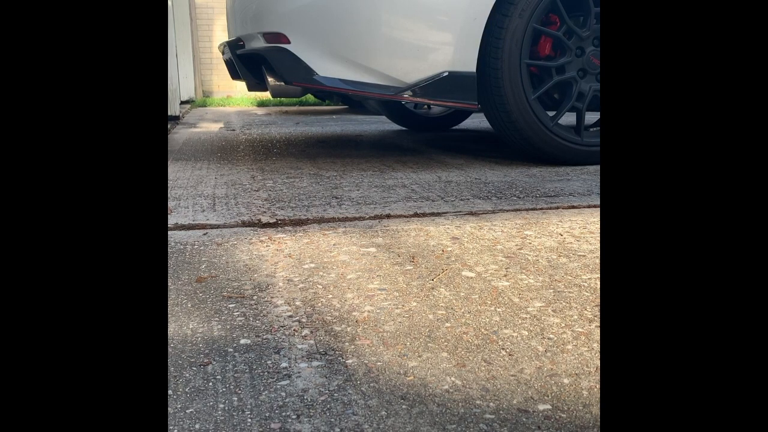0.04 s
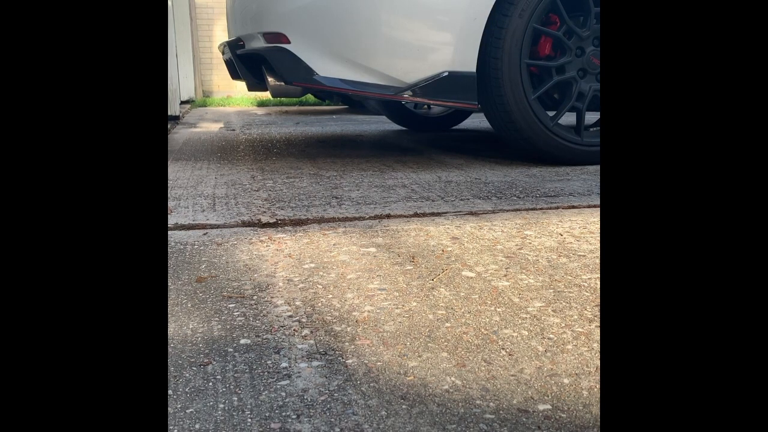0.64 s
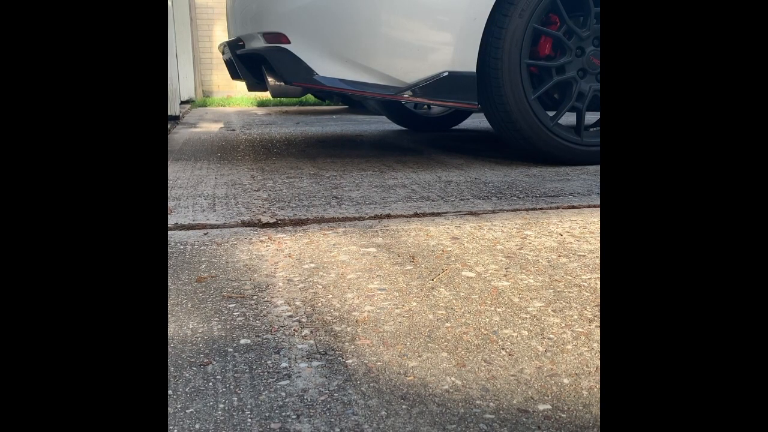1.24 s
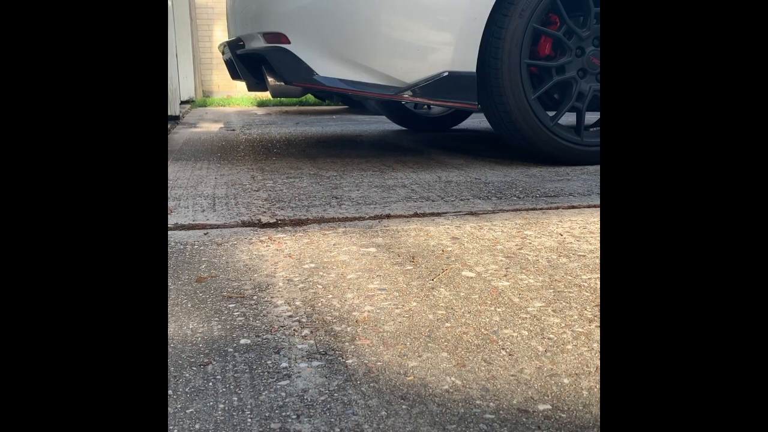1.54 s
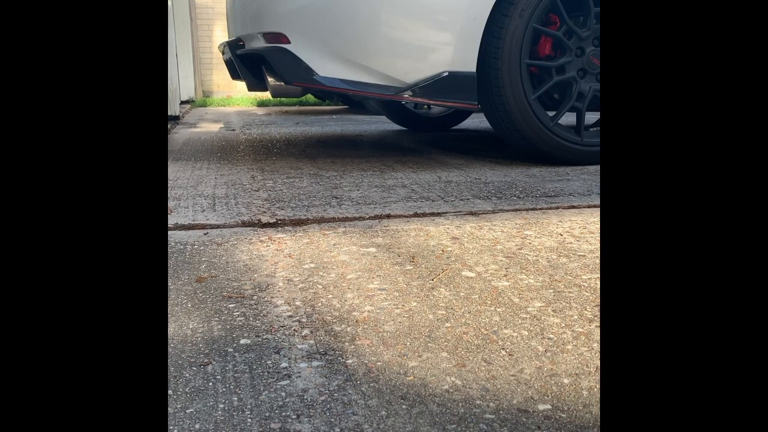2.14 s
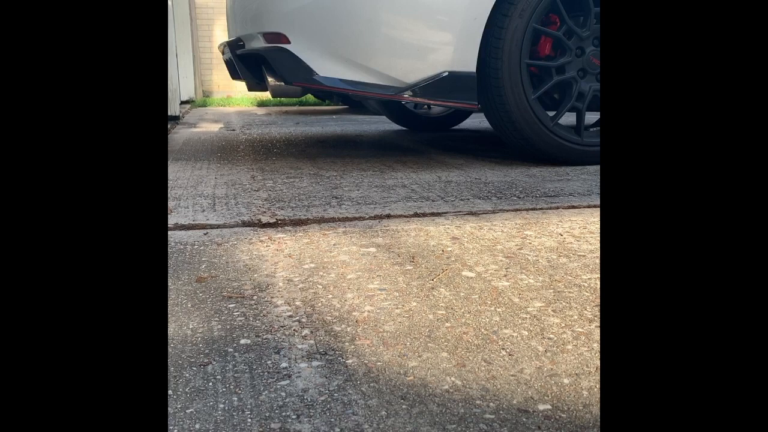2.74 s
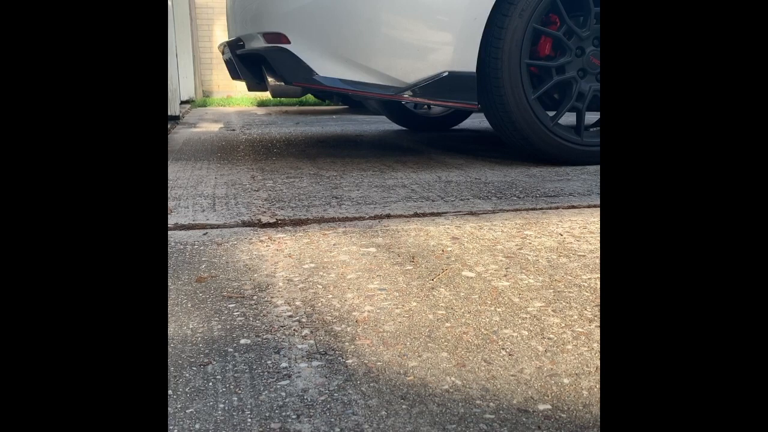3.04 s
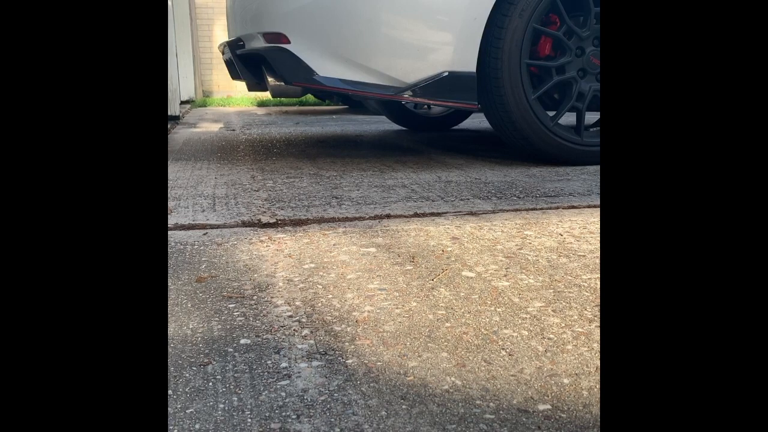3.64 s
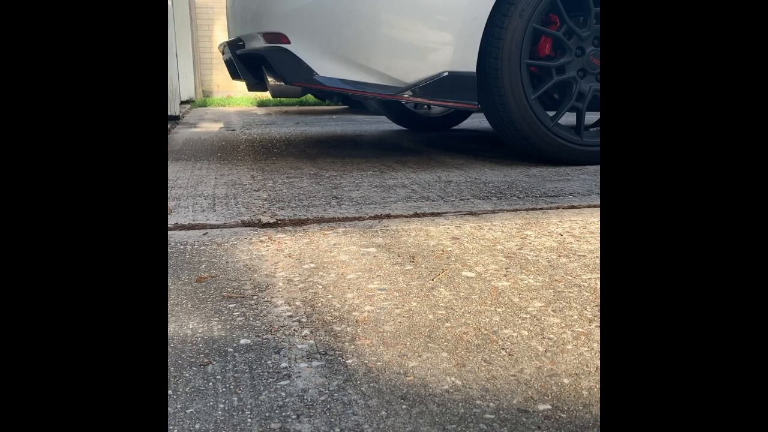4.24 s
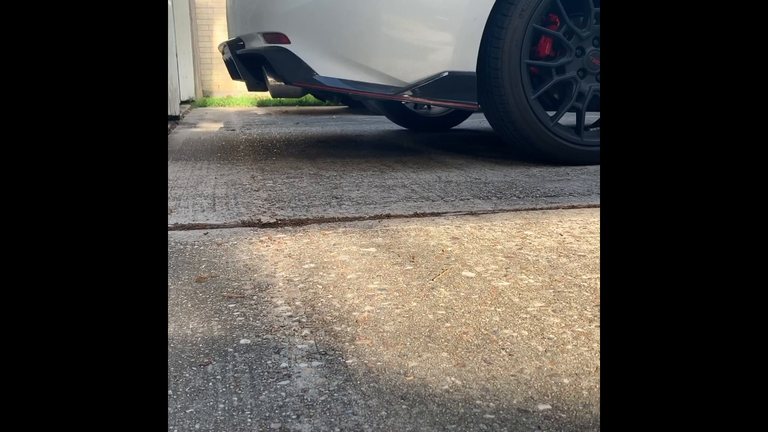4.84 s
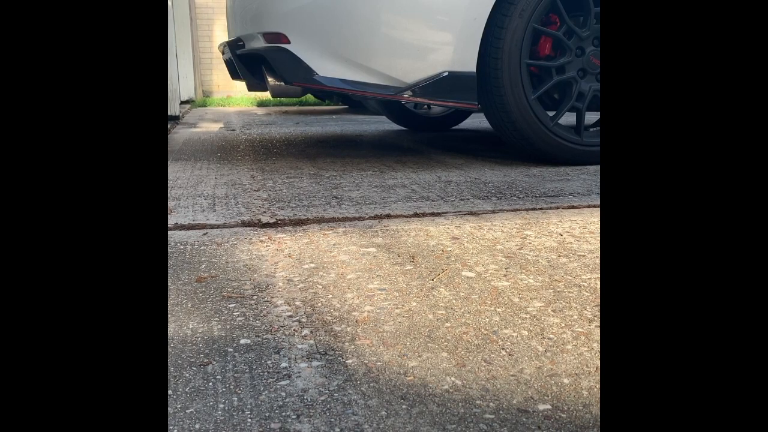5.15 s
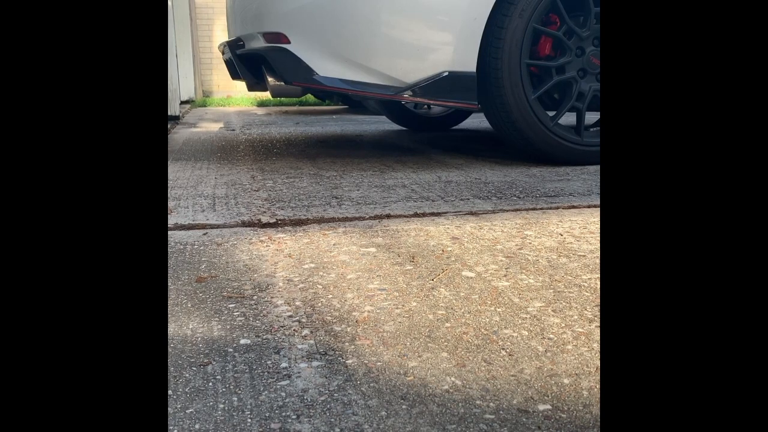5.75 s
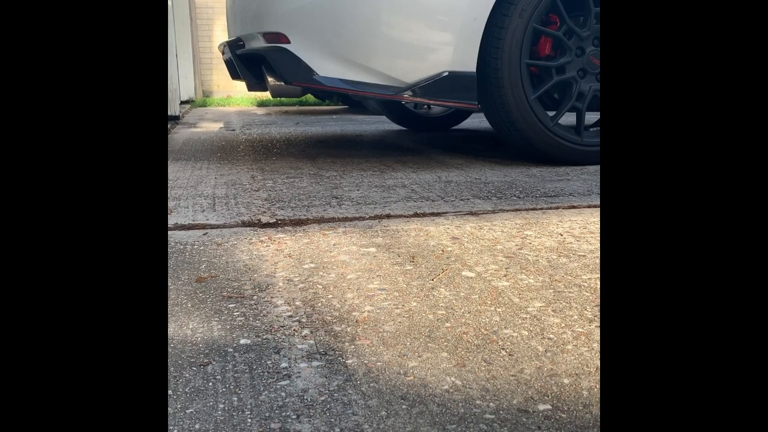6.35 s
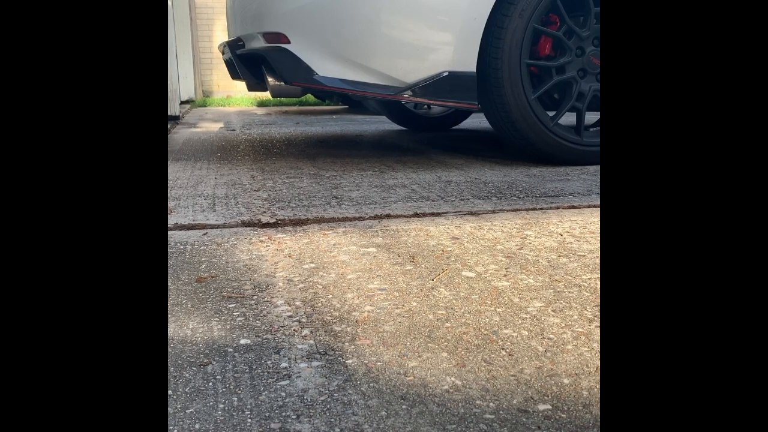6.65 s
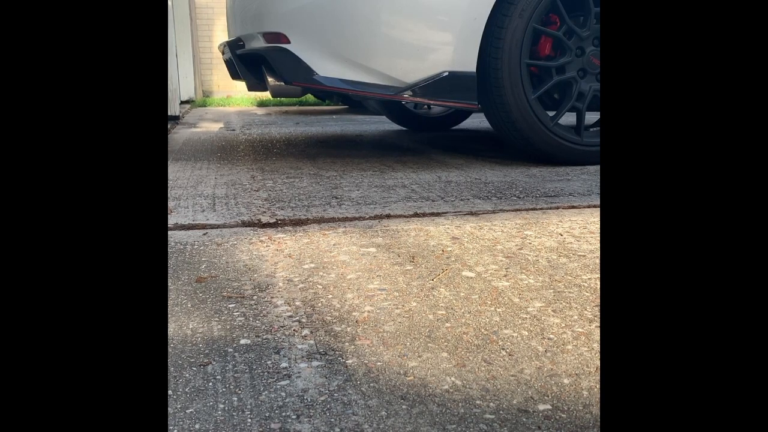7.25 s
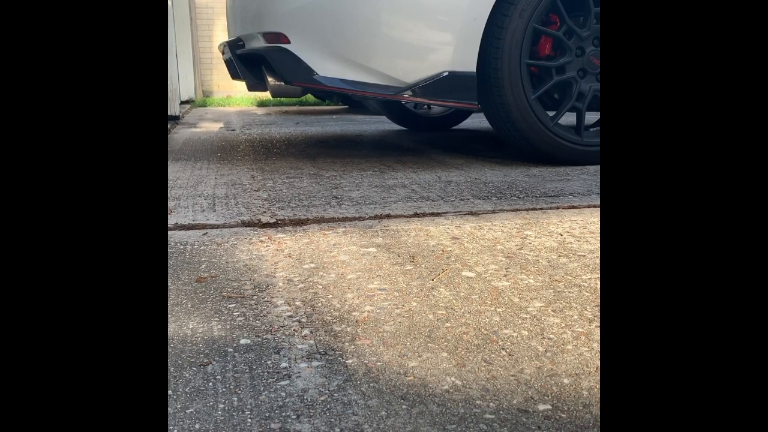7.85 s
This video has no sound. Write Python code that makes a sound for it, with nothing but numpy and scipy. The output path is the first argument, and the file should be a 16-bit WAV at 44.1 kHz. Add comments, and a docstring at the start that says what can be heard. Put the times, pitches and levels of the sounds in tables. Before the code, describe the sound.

Low, steady car engine idle broken by one quick rev that burbles and pops as it drops, while distant birds chirp faintly.

```python
"""A six-cylinder car idles, heard beside its tailpipes. One throttle blip: the intake barks,
the revs fall with a burble and a few soft pops, sag, and recover.
Firing pulses ring silencer, pipe and tips; turbulent gas rasps; fuel pops in the pipe.
Valve gear and belts rustle under the body. Birds call far off; wall and ground echo."""
import sys
import numpy as np
from scipy import signal
from scipy.fft import rfft, irfft, next_fast_len
from scipy.io import wavfile
from scipy.ndimage import uniform_filter1d, minimum_filter1d, map_coordinates

SR = 44100
rng = np.random.default_rng(int(sys.argv[2]) if len(sys.argv) > 2 else 0)


def persist_wave(psi):
    """Save psi, clipped to +-1, as 16-bit WAV."""
    counts = np.round(np.clip(psi, -1, 1) * 32767).astype(np.int16)
    wavfile.write(sys.argv[1], SR, np.atleast_2d(counts).T)


N = 352800
TIME_S = np.arange(N) / SR

# Crank speed. Each row: time in seconds, firing rate in Hz.
FIRING_RATE = [(0, 44.2), (.3, 50.18), (.55, 52.12), (1.4, 50.63), (2.74, 51.05), (2.8, 54), (2.866, 61.7),
               (2.938, 80.5), (2.99, 93.2), (3.045, 110.2), (3.07, 116), (3.12, 122.2), (3.2, 124.4),
               (3.38, 120.3), (3.52, 114.3), (4.1, 80.8), (4.28, 66.5), (4.45, 55.95), (4.7, 43.8),
               (5.22, 44.7), (5.7, 51.32), (6.1, 52.92), (6.9, 52.74), (7.5, 54.08), (7.8, 54.05), (8, 45)]
# Engine load. Each row: time in seconds, throttle 0-1, tip level in dB.
LOAD = [(0, 0.25, -22.5), (.15, 0.46, -24.5), (.55, 0.13, -21), (1.4, 0.09, -24.5), (2.74, 0.05, -24.5),
        (2.85, 0.63, -20), (3.03, 0.99, -14), (3.22, 0.87, -15), (3.4, 0, -23.5), (3.95, 0.06, -23.5),
        (4.3, 0.06, -28.5), (4.8, 0.09, -27.5), (5.3, 0.46, -24), (5.85, 0.21, -21.5), (7.78, 0.16, -22.5),
        (7.81, 0.08, -30), (8, 0.08, -43)]
# Cylinders in firing order. Each row: strength in dB, lag in firings; scaled per exhaust path.
CYLINDER_OFFSETS = [(3.6, 0.011), (0.9, -0.01), (2.8, -0.002), (3.84, 0.012), (4, -0.0094), (1.6, -0.002)]
# Late burning in the pipe. Each row: start and length in seconds, boom, drone and tip lifts in dB.
BURBLE_RUNS = [(3.467, 0.098, 0, 6.5, 7), (3.663, 0.062, -1, 8.5, 8.5), (3.773, 0.023, -10, 8, 5.5),
               (4.074, 0.043, 3, 9.5, 10), (4.142, 0.056, 1, 3.5, -0.5), (4.346, 0.09, -0.5, 9.5, 6)]
# Injectors shut while coasting. Each row: start and end in seconds, boom and drone changes in dB.
INJECTOR_CUTS = [(3.746, 4.134, -6, -6), (4.237, 4.34, -4, 0), (7.901, 7.949, -11.5, -5.5)]
# Fuel popping in the pipe. Each row: time in seconds, relative level in dB, snap level in dB.
FUEL_POPS = [(3.008, -3.5, -11), (3.021, -14, -14), (3.065, -22, -25), (3.465, -11.5, -37.5),
             (3.478, -13.5, -21), (3.508, -13.5, -32), (3.549, -10, -29), (3.674, -16, -29.5),
             (3.684, -10, -25.5), (3.708, -17, -31), (3.787, -25.5, -34), (4.073, -32, -41),
             (4.104, -15, -36), (4.125, -23.5, -42), (4.195, -27, -24), (4.357, -11, -17),
             (4.427, -19.5, -39)]
# Third-harmonic hums and tip howls. Each row: start and end in seconds, level in dB.
HUM_SPANS = [(3.683, 3.735, -31), (3.763, 3.808, -23), (4.169, 4.217, -13.5)]
HOWL_SPANS = [(.03, .26, -32), (5.2, 5.5, -38)]
# Belt chirps. Each row: peak time in seconds, level in dB.
BELT_CHIRPS = [(.32, -47.5), (.43, -44), (.55, -49.5), (.9, -46.5), (1.38, -51), (2.08, -49.5),
               (2.891, -37.5), (3.003, -28.5), (3.99, -45), (4.19, -50), (4.98, -54), (5.24, -52.5),
               (5.37, -45.5), (5.515, -46), (5.63, -43), (5.979, -43.5), (6.2, -44.5), (6.55, -44.5),
               (7.0, -45.5), (7.12, -46.5), (7.43, -48), (7.669, -47.5)]
# Bird notes. Each row: start and length in seconds, start and end pitch in Hz,
# relative level in dB, trill depth in Hz.
BIRD_NOTES = [(0.828, .035, 2990, 2750, -38, 20), (0.872, .07, 2570, 2400, -40, 170),
              (0.946, 0.064, 2760, 2570, -38, 20), (1.394, 0.055, 3140, 2710, -34.5, 20),
              (1.435, 0.069, 2410, 2420, -37.5, 120), (1.509, 0.06, 2740, 2545, -35, 20),
              (2.019, 0.078, 3140, 2900, -36.5, 240), (2.112, 0.033, 2650, 2400, -37.5, 110),
              (2.477, 0.096, 2800, 2640, -38, 40), (2.528, .015, 2470, 2250, -37, 130),
              (2.573, .08, 2406, 2303, -33.5, 16), (5.102, .04, 1060, 987, -31, 45),
              (6.565, .035, 2900, 2740, -41, 130), (6.588, 0.055, 2600, 2430, -43.5, 170),
              (6.656, .06, 2660, 2600, -36.5, 50), (7.12, 0.027, 3037, 2770, -30.5, 20),
              (7.15, 0.045, 2520, 2430, -37, 150), (7.223, .065, 2660, 2520, -37, 20),
              (7.767, 0.083, 3140, 2950, -34.5, 270)]

# Exhaust responses. Each row: frequency in Hz, gain in dB.
SILENCER_RESPONSE = [(12, -53.5), (25, -35), (42, 3), (55, 17), (78, 2), (100, -31.5), (135, -51),
                     (300, -69.5), (1500, -160)]
LONG_PIPE_RESPONSE = [(60, -43.5), (118, -15), (140, -31.5), (165, -1), (190, -4), (215, 3.5), (250, 0.5),
                      (290, -22), (380, -54), (800, -120)]
TIP_RESPONSE = [(150, -62.5), (235, -14), (280, -2), (306, 10), (345, 9), (378, -4), (405, -11), (432, -9),
                (470, -22), (505, -7), (580, -11), (620, -18), (655, -10.5), (730, -34.5), (815, -25),
                (950, -42), (2500, -70.5), (8000, -120)]
RASP_RESPONSE = [(100, -36), (200, 13), (260, 11.5), (350, 13), (460, -24.5), (510, 13), (570, 10.5),
                 (660, 5.5), (730, -20.5), (840, -2.5), (980, -13.5), (1200, -26), (2500, -37.5),
                 (6000, -29.5), (12000, -100)]
GROWL_RESPONSE = [(120, -34.5), (165, -11), (200, 3.5), (232, -5), (255, 2)]
POP_RESPONSE = [(100, -38.5), (210, 7), (350, 11), (450, -4), (540, 3), (660, 4.5), (740, -4.5), (840, 0),
                (980, -18), (1250, -13), (1700, -45), (3000, -36), (10000, -100)]
SNAP_RESPONSE = [(400, -35.5), (850, 11), (1020, -7), (1230, -3), (1650, 1), (2200, -20), (6000, -18.5),
                 (12000, -47)]
# Engine bay noise spectra. Each row: frequency in Hz, gain in dB.
RUSTLE_SPECTRUM = [(410, 7.5), (700, -9.5), (754, -5.5), (838, -4), (910, -9.5), (1010, -11), (1380, -12),
                   (1660, -10), (1810, -14), (2040, -14.5), (2270, -16), (3640, -26.5), (4200, -34),
                   (5460, -51.5), (9240, -120)]
HISS_SPECTRUM = [(2500, -2), (3200, 0), (3800, -5.5), (4400, 0.5), (5000, 2.5), (5600, -3), (7400, 0.5),
                 (9400, -1.5), (9700, 2), (9950, 3), (11000, -14), (13000, -3), (14200, -6.5), (15200, -20)]
SWISH_SPECTRUM = [(600, -36), (1100, -16.5), (1450, -3.5), (1650, -9.5), (1950, -1.5), (2300, -13.5),
                  (4000, -31.5), (8000, -80.5)]
CHIRP_SPECTRUM = [(900, -32), (1480, -12), (1650, 4), (1830, -12.5), (2000, -6.5), (2200, -21), (5000, -53)]
# Faint, steady, narrow tones in the background noise. Each row: centre in Hz, width in Hz, gain in dB.
NARROW_TONES = [(1140, 24, 7.5), (1644, 14, -3.5), (1966, 11, 6), (2366, 26, 1), (2570, 39, -6),
                (2893, 20, -0.5), (4800, 76, -15.5), (8750, 46, -16)]
# Echo decay. Each row: frequency in Hz, T60 in seconds.
YARD_T60 = [(100, 0.06), (600, 0.38), (3000, 0.16), (10000, 0.21)]
# Noise width. Each row: frequency in Hz, side minus mid in dB.
STEREO_WIDTH = [(60, -29.5), (110, -18), (200, -10), (380, -10), (700, -2.5), (1290, 1.5), (2380, 0.5),
                (4400, 9.5), (8120, -7), (15000, 0.5)]
# Balance before the bass is centred. Each row: frequency in Hz, left minus right in dB.
STEREO_TILT = [(200, -1.5), (380, 0.5), (700, 3.5), (1300, -0.5), (2400, 0), (4400, -2.5), (8000, 0.5)]

IDLE_HZ, TIP_LEAD_FIRINGS = 51, 0.4015
SCATTER_DB, SAG_DB_PER_HZ, COAST_DB_PER_HZ_PER_S = .52, .012, .029
BOOM_DB, BOOM_THROTTLE_DB, BOOM_DB_PER_S = -16, 3.5, 0.1845
DRONE_DB, DRONE_THROTTLE_DB = -25.5, 14.5
BURBLE_ATTACK_S, BURBLE_RELEASE_S, CUT_RAMP_S = 0.0028, 0.029, 0.014
RASP_DB, RASP_PER_SCATTER, RASP_GULP_DB, RASP_THROTTLE_DB = -14, 3.3, 4, 3.5
GROWL_DB, HOWL_HZ, HOWL_HALF_WIDTH_HZ = -6.5, 578, 26
GULP_LAG_S, GULP_EXPONENT = 0.011, 0.74
BAY_DB, BAY_DB_PER_OCTAVE, BAY_GULP_DB, BAY_DB_PER_S = -47.5, 3, 14, 0.32
HISS_DB, HISS_DB_PER_OCTAVE, HISS_GULP_DB, HISS_DB_PER_S = -51.5, 5, 3, 0.13
BELT_DB, BELT_RUB_FIRINGS, CHIRP_RAMP_S = -54, 4.4, 0.032
SPIT_S, SPIT_DB, RUMBLE_DB = 4.5, -53, -43
PIPE_LAG_S, HISS_LAG_S, HISS_DIFFUSE_DB = 0.00024, .00021, 3.5


def exhaust(phase):
    """Firing pulses ring the silencer (boom), the long pipe (drone) and the tips."""
    boom_db, drone_db, tip_db = exhaust_levels()
    pulses = firings(phase, bank_db=-10, bank_lag=0.026, imbalance=0.7, jitter=0.02)
    boom = unit(ring(pulses, SILENCER_RESPONSE))
    pulses = firings(phase, bank_db=2.5, bank_lag=0.015, imbalance=0.74)
    drone = chamber(pulses, LONG_PIPE_RESPONSE, delay_s=0.0075)
    pulses = firings(phase + TIP_LEAD_FIRINGS, bank_db=-7.5, bank_lag=0.049, imbalance=1.03)
    tips = chamber(pulses, TIP_RESPONSE, delay_s=.012)
    return amp(boom_db) * boom + amp(drone_db) * drone + amp(tip_db) * tips + gas_rasp(phase, tip_db)


def firings(phase, bank_db, bank_lag, imbalance, jitter=.012):
    """One pulse per firing. Banks alternate; throttle shrinks the far bank's offset (dB, firings)."""
    k = np.arange(int(phase[-1]) + 1)
    due = np.searchsorted(phase, k)
    far_bank = k % 2 * (1 - throttle()[due])
    scatter = scatter_db()[due]
    random_db, random_lag = rng.standard_normal((len(k), 2)).T * [scatter, scatter ** 2]
    own_db, own_lag = imbalance * np.array(CYLINDER_OFFSETS)[k % len(CYLINDER_OFFSETS)].T
    fired = np.searchsorted(phase, k + far_bank * bank_lag + own_lag + jitter * random_lag)
    return np.bincount(np.clip(fired, 0, N - 1), amp(far_bank * bank_db + own_db + random_db), N)


def chamber(pulses, response, delay_s):
    """A winding chamber rings and holds higher tones back; delay_s applies at 300 Hz."""
    dispersed = filtered(pulses, lambda hz: np.exp(-1j * np.pi * delay_s * hz ** 2 / 300))
    return steady(ring(dispersed, response))


def exhaust_levels():
    """Boom, drone and tip dB follow the load. Burbles lift them; fuel cuts drop boom and drone."""
    lift_db = sum(np.outer(lifts, swell(start, start + length, BURBLE_ATTACK_S, BURBLE_RELEASE_S))
                  for start, length, *lifts in BURBLE_RUNS)
    boom_cut_db, drone_cut_db = sum(np.outer(cuts, swell(start, end, CUT_RAMP_S, CUT_RAMP_S))
                                    for start, end, *cuts in INJECTOR_CUTS)
    boom_db = BOOM_DB + BOOM_THROTTLE_DB * throttle() + BOOM_DB_PER_S * TIME_S + boom_cut_db
    drone_db = DRONE_DB + DRONE_THROTTLE_DB * throttle() + drone_cut_db
    return lift_db + [boom_db, drone_db, curves(LOAD)[1]]


def crank():
    """Firing rate in Hz, smoothed by the flywheel, and its slope in Hz/s."""
    rate_hz = uniform_filter1d(curves(FIRING_RATE)[0], size=2200)
    return rate_hz, np.gradient(rate_hz) * SR


def throttle():
    """Throttle opening, 0-1."""
    return np.clip(curves(LOAD)[0], 0, 1)


def scatter_db():
    """Scatter of firing strength: burning turns ragged when the engine sags or coasts."""
    rate_hz, slope = crank()
    sag_hz, fall_hz_per_s = np.maximum([IDLE_HZ - rate_hz, -slope * (1 - throttle())], 0)
    return SCATTER_DB + SAG_DB_PER_HZ * sag_hz + COAST_DB_PER_HZ_PER_S * fall_hz_per_s


def gulp():
    """Air intake, 0-1: lags the power that spins the crank up."""
    rate_hz, slope = crank()
    power = np.maximum(uniform_filter1d(rate_hz * slope, size=2600), 0)
    return np.interp(TIME_S - GULP_LAG_S, TIME_S, power / power.max())


def gas_rasp(phase, tip_db, decay_s=0.14):
    """Each firing drives a puff of turbulent gas against the tips."""
    pulses = firings(phase, bank_db=-10, bank_lag=0.028, imbalance=4.7)
    puffs = signal.lfilter([1], [1, -np.exp(-1 / (decay_s * SR))], pulses)
    rasp = steady(ring(puffs * rng.standard_normal(N), RASP_RESPONSE))
    lift_db = RASP_PER_SCATTER * scatter_db() + RASP_GULP_DB * gulp() + RASP_THROTTLE_DB * throttle()
    return amp(tip_db + RASP_DB + lift_db) * rasp


def growl(phase):
    """Firing harmonics ring the pipe: the second as the revs climb, the third after some burbles."""
    second = amp(GROWL_DB + along(GROWL_RESPONSE, 2 * crank()[0])) * np.sqrt(gulp())
    third = sum(amp(db) * swell(start, end, 0.023, 0.066) for start, end, db in HUM_SPANS)
    return second * np.sin(2 * np.pi * 2 * phase) + third * np.sin(2 * np.pi * 3 * phase)


def pops(puff_rise_s=0.0013, puff_t60_s=0.11, snap_t60_s=0.071):
    """Fuel pops: a pressure push and a rough puff ring the pipe, with a snap at its mouth."""
    t = np.arange(SR // 8) / SR
    attack = 1 - np.exp(-t / puff_rise_s)
    pushes, puffs, snaps = np.zeros((3, N))
    for start_s, db, snap_db in FUEL_POPS:
        puff, snap = rng.standard_normal((2, len(t)))
        add(pushes, start_s, amp([db + 26.5]))
        add(puffs, start_s, amp(db + 6 - 60 * t / puff_t60_s) * attack * puff)
        add(snaps, start_s, amp(snap_db - 60 * t / snap_t60_s) * snap)
    return ring(pushes + puffs, POP_RESPONSE) + ring(snaps, SNAP_RESPONSE)


def howl():
    """A narrow tip resonance sings as the engine pulls up from a sag."""
    noise = rng.standard_normal(N)
    tone = steady(filtered(noise, lambda hz: 1 / (1 + ((hz - HOWL_HZ) / HOWL_HALF_WIDTH_HZ) ** 4)))
    return tone * sum(amp(db) * swell(start, end, .05, .04) for start, end, db in HOWL_SPANS)


def engine_bay(phase):
    """Valve gear and belts rustle, faint tones ring, a hiss ticks; all grow with revs and intake."""
    octaves, air = np.log2(crank()[0] / IDLE_HZ), gulp()
    bay_db = (BAY_DB + BAY_DB_PER_OCTAVE * octaves + BAY_GULP_DB * air ** GULP_EXPONENT
              + BAY_DB_PER_S * TIME_S)
    hiss_db = HISS_DB + HISS_DB_PER_OCTAVE * octaves + HISS_GULP_DB * air + HISS_DB_PER_S * TIME_S
    cam = np.cos(phase * np.pi / 3)  # one turn per six firings
    tick = np.exp(-(phase / 2 % 1) / .25)  # every second firing
    flutter_db = 1.4 * wobble(70) * (1 - air / 2)
    rustle = rush(spectrum(RUSTLE_SPECTRUM)) * amp(bay_db + 9.5 + flutter_db + 0.5 * tick)
    tones = rush(narrow_tone_response) * amp(bay_db - 9 + 0.39 * cam + 1.6 * wobble(16))
    hiss = underbody_hiss() * amp(hiss_db + 1.4 * tick + .8 * wobble(90))
    return rustle + tones + hiss * amp([[-.5], [.5]])


def narrow_tone_response(hz):
    """Parallel resonators pick narrow ringing tones out of noise."""
    return sum(amp(db) * 1j * hz * width / (centre ** 2 - hz ** 2 + 1j * hz * width)
               for centre, width, db in NARROW_TONES)


def underbody_hiss():
    """Hiss from under the car: a direct part, late on the right, over a diffuse part."""
    noises = filtered(rng.standard_normal((3, N)), spectrum(HISS_SPECTRUM))
    direct = filtered(noises[0], lambda hz: np.exp(1j * np.pi * hz * HISS_LAG_S * np.array([[1], [-1]])))
    diffuse = filtered(noises[1:], lambda hz: 1 / (1 + (hz / 7000) ** 2))
    return unit(direct + amp(HISS_DIFFUSE_DB) * diffuse)


def belt(phase):
    """The belt rubs once per cam turn and now and then chirps."""
    rub = (1 + np.cos((phase - BELT_RUB_FIRINGS) * np.pi / 3)) / 2
    level_db = BELT_DB + BAY_DB_PER_S * TIME_S + 2 * wobble(9.5)
    swish = rush(spectrum(SWISH_SPECTRUM)) * rub ** 2 * amp(level_db)
    chirps = sum(amp(db) * swell(s - CHIRP_RAMP_S, s, CHIRP_RAMP_S, CHIRP_RAMP_S)
                 for s, db in BELT_CHIRPS)
    return swish + rush(spectrum(CHIRP_SPECTRUM)) * chirps


def air_valve():
    """A valve lets out one thin spit of air as the revs settle."""
    air = rush(lambda hz: np.exp(-((hz - 9200) / 1500) ** 2))
    return air * amp(SPIT_DB) * swell(SPIT_S, SPIT_S + .015, .006, .02)


def birds():
    """Short whistles, mostly falling, some with a fast, rough trill."""
    song, trill, waver = np.zeros(N), wobble(600), wobble(220)
    for start_s, length_s, start_hz, end_hz, db, trill_hz in BIRD_NOTES:
        progress = np.linspace(0, 1, int(length_s * SR))
        span = int(start_s * SR) + np.arange(len(progress))
        hz = start_hz + (end_hz - start_hz) * progress + trill_hz * trill[span]
        envelope = amp(db + 2 * waver[span]) * np.sqrt(np.abs(np.sin(np.pi * progress)))
        add(song, start_s, envelope * np.sin(2 * np.pi * np.cumsum(hz) / SR))
    return song


def rumble():
    """Low outdoor background."""
    return amp(RUMBLE_DB) * unit(filtered(rng.standard_normal(N), lambda hz: 1 / (1 + (hz / 110) ** 4)))


def yard(x):
    """Scattered echoes off wall and ground, different at each ear, weak in the bass."""
    hz, t, noise = signal.stft(rng.standard_normal((2, SR // 2)), SR, nperseg=256)
    tail = signal.istft(noise * amp(-60 * t / along(YARD_T60, hz)[:, None]), SR, nperseg=256)[1]
    wet = signal.fftconvolve(x[None], tail / np.linalg.norm(tail[0]), axes=1)[:, :N]
    return filtered(wet, lambda f: f ** 2 / (f ** 2 + 750 ** 2))


def amp(db):
    """dB to gain."""
    return 10 ** (np.asarray(db) / 20)


def unit(x):
    """Scale to rms 1."""
    return x / np.sqrt(np.mean(x ** 2) + 1e-20)


def steady(x):
    """Scale to running rms 1."""
    power = uniform_filter1d(uniform_filter1d(x ** 2, size=3500), size=2600)
    return x / np.sqrt(np.abs(power) + 1e-20)


def along(points, hz):
    """Interpolate (Hz, value) points on a log axis."""
    knots_hz, values = np.transpose(points)
    return np.interp(np.log(hz + 1), np.log(knots_hz + 1), values)


def spectrum(points):
    """(Hz, dB) points as a gain function of frequency."""
    return lambda hz: amp(along(points, hz))


def curves(rows):
    """One value per sample for each column after the time."""
    knots_s, *columns = np.transpose(rows)
    return [np.interp(TIME_S, knots_s, column) for column in columns]


def swell(start_s, end_s, attack_s, release_s):
    """Attack, hold and release, 0-1."""
    return np.clip(np.minimum((TIME_S - start_s) / attack_s, 1 - (TIME_S - end_s) / release_s), 0, 1)


def wobble(knots_per_s):
    """Smooth random curve."""
    return map_coordinates(rng.standard_normal(int(N * knots_per_s / SR) + 4), [TIME_S * knots_per_s])


def filtered(x, response):
    """Apply a frequency response."""
    size = next_fast_len(N + SR // 2)
    return irfft(rfft(x, size) * response(np.fft.rfftfreq(size, 1 / SR)), size)[..., :N]


def ring(x, points, size=32768):
    """Drive a minimum-phase body with a (Hz, dB) response."""
    cepstrum = irfft(np.log(amp(along(points, np.fft.rfftfreq(size, 1 / SR)))))
    cepstrum[1:size // 2] *= 2
    cepstrum[size // 2 + 1:] = 0
    impulse = irfft(np.exp(rfft(cepstrum)))[:size // 2]
    running = np.pad(x, (size // 4, 0), "reflect")  # already ringing at the start
    return signal.fftconvolve(running, impulse)[size // 4:][:N]


def rush(response):
    """Stereo noise with mid rms 1, wider in the treble."""
    mid, side = filtered(rng.standard_normal((2, N)), response)
    side = filtered(side, spectrum(STEREO_WIDTH))
    return np.array([mid + side, mid - side]) / np.std(mid)


def add(track, start_s, sound):
    """Mix a sound into a track."""
    part = track[round(start_s * SR):][:len(sound)]
    part += sound[:len(part)]


def sides(hz):
    """+1 left, -1 right, fading to 0 in the bass."""
    return np.array([[1], [-1]]) * hz ** 2 / (hz ** 2 + 110 ** 2)


def scene():
    """Car and birds in a yard. The tailpipes reach the left ear first; the bass stays centred."""
    phase = np.cumsum(crank()[0]) / SR - .45  # in firings
    pipes = exhaust(phase) + rumble() + growl(phase) + howl() + pops()
    direct = filtered(pipes, lambda hz: np.exp(1j * np.pi * hz * PIPE_LAG_S * sides(hz)))
    song = birds()
    far_birds = amp(-6) * song + amp(-2) * yard(song)
    car = direct + amp(0.5) * yard(pipes) + engine_bay(phase) + belt(phase) + air_valve()
    return filtered(car + far_birds, lambda hz: amp(sides(hz) * along(STEREO_TILT, hz) / 2))


def record(dry):
    """Peak limiter, then a brick-wall low-pass."""
    ceiling, top_hz = .94, 15200
    needed = np.minimum(1, ceiling / (np.abs(dry).max(0) + 1e-9))
    gain = uniform_filter1d(minimum_filter1d(needed, size=600), size=300)
    return filtered(dry * gain, lambda hz: hz < top_hz)


dry = scene()
out = record(dry)
persist_wave(out)
```